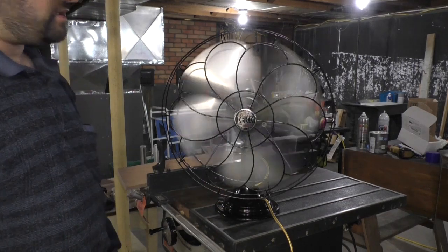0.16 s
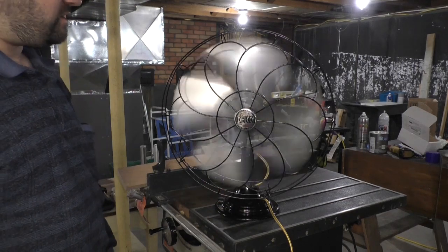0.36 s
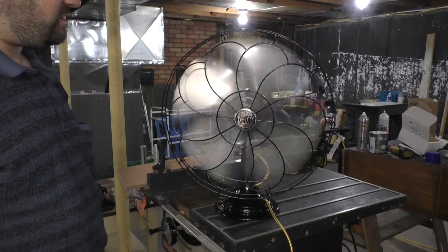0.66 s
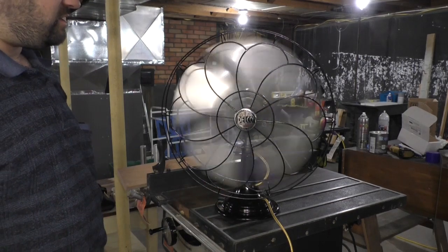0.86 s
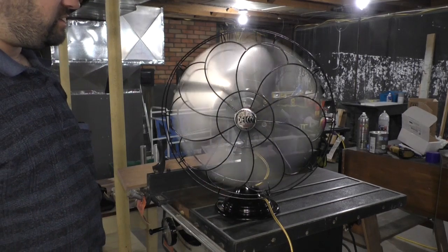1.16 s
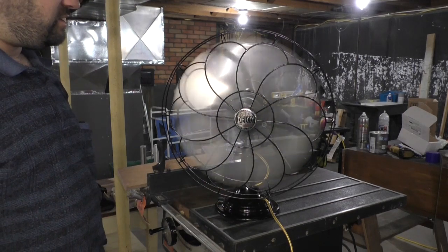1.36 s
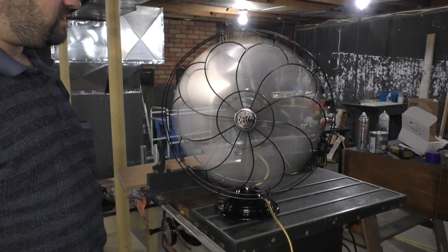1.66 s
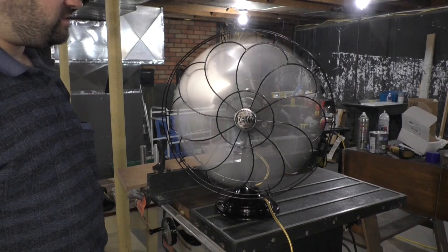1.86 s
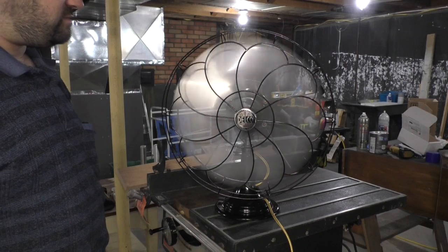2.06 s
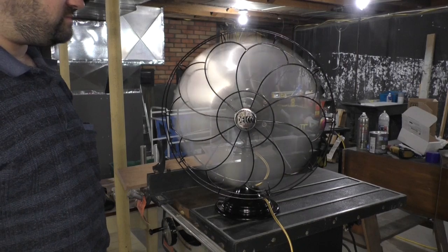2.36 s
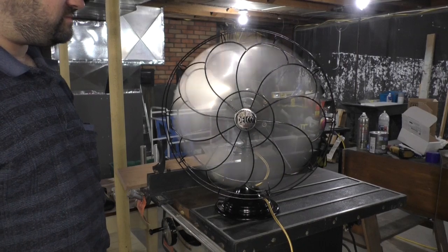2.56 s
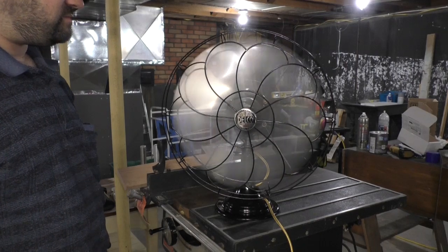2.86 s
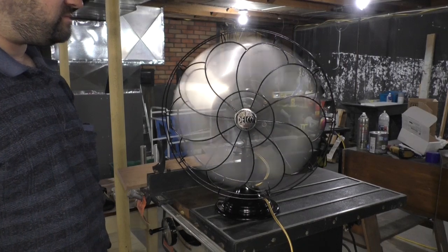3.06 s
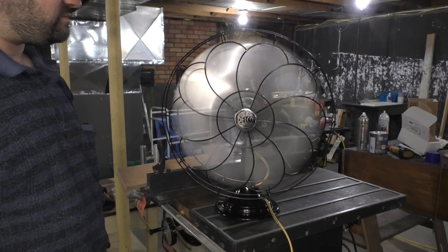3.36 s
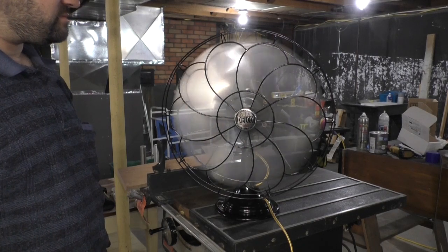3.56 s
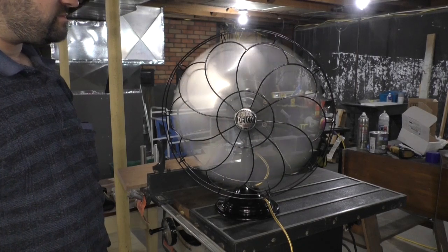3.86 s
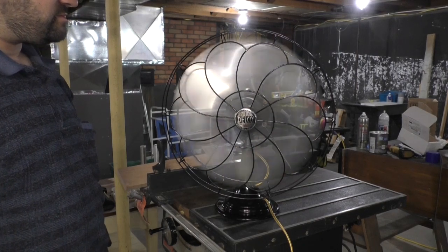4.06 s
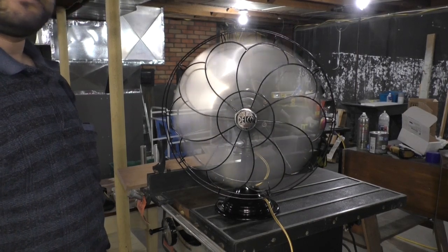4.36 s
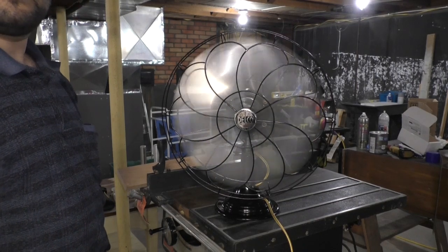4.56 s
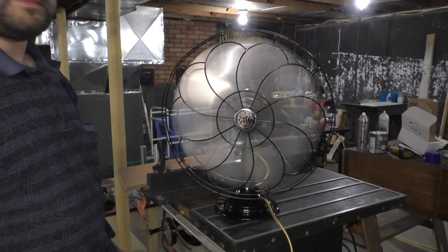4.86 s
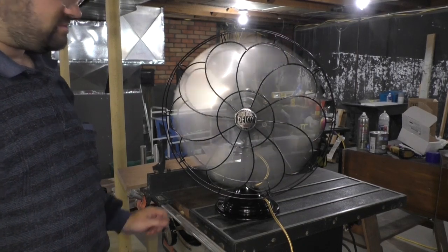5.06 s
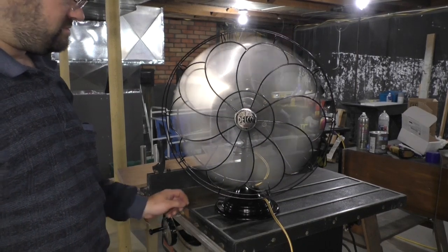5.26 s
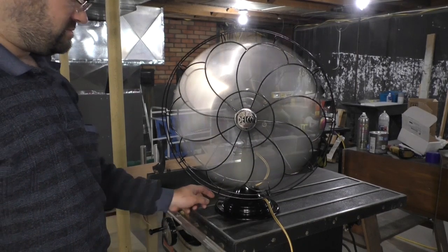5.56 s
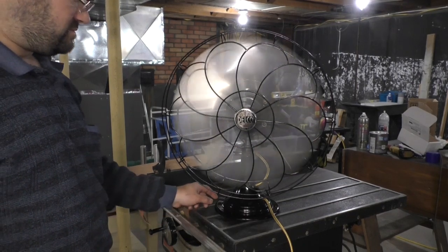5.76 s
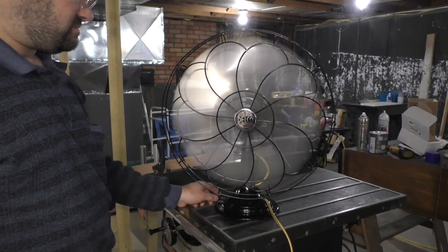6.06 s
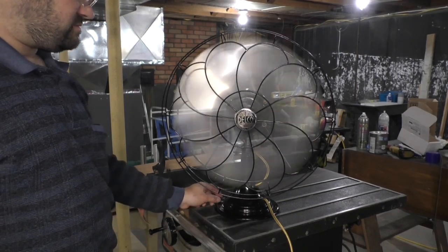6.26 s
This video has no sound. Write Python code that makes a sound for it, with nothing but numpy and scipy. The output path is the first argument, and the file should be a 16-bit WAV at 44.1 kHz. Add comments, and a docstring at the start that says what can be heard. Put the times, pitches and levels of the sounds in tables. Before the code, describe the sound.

A large vintage fan runs up in front of a close stereo microphone. First comes a pulsing electric hum over faint room tone, then a soft bump and deep wind rumble. Blade hiss brightens into a steady broad rush, with brief thin metallic chatter. Strong air buffets the microphone ever more densely with thuds, flaps and crackling pops, overloading slightly, and never stops.

```python
"""An old desk fan runs up in a workshop, facing a two-port microphone that its air stream reaches.
The motor hums in harmonics of the mains pull, a loose part rings at every knock, and the blades shed
hiss that reaches higher as the fan runs up. Gusts of shaped noise, thumping eddies, tearing flutters,
pops and spikes buffet the ports over a quiet room tone. The input cuts more bass along a set time
course, ducks its gain when the level is high and rounds off the peaks."""
import sys
import numpy as np
from scipy import signal
from scipy.io import wavfile
from scipy.ndimage import uniform_filter1d, minimum_filter1d

SR = 44100
rng = np.random.default_rng(int(sys.argv[2]) if len(sys.argv) > 2 else 0)


def materialize(psi):
    """Save the field psi as 16-bit PCM at rate SR to the path in sys.argv[1].

    A 1-D psi becomes a single channel; in a 2-D psi each row is a channel.
    """
    bounded = np.clip(np.atleast_2d(psi).T, -1, 1)
    quanta = np.round(bounded * 32767).astype(np.int16)
    wavfile.write(sys.argv[1], SR, quanta)


N = 282548
HOP, SIZE = 128, 512  # noise frames, in samples
FRAME_T = np.arange(N // HOP + 5) * HOP / SR
BIN_HZ = np.fft.rfftfreq(SIZE, 1 / SR)[:, None]
HALF_EACH = np.array([[.5], [-.5]])  # splits a left-right difference between the ports

# Rotor speed: (time [s], speed [turns/s])
ROTOR_SPEED = [(0, 8.3), (.6, 9.0), (1.0, 10.6), (1.5, 12), (1.9, 15), (2.4, 16.1), (3.3, 16.8),
               (5.0, 17.5), (6.41, 17.4)]
FIRST_TURN = .13  # part of a turn already done at the start

# Motor hum, before its swell: (multiple of the mains pull, level [dB rms without throb],
# throbs per rotor turn, throb depth [0-1], throb lag [turns], left-right difference [dB])
HUM_HARMONICS = [(1, -35.5, 1, .65, -.036, 1), (2, -32, 1, .12, .04, -.5), (3, -31, 2, .1, 0, -.5),
                 (4, -41, 2, .4, .13, 3)]
# Swell of the whole hum: (time [s], level [dB])
HUM_SWELL = [(0, -6.5), (.15, -5), (.45, -4), (.64, -5.5), (.72, -12), (1.5, -14), (6.41, -16)]
MAINS_PULL_HZ, HUM_WAVER_DB = 119.9, 1.2

# Rings of the loose part: (frequency [Hz], width [Hz], level [dB])
LOOSE_PART_RINGS = [(3940, 90, 0), (6340, 75, -8), (8270, 130, -21), (9680, 110, -20)]
# Spells of chatter: (start [s], length [s], level at the end before chance and turn [dB])
CHATTER_SPELLS = [(1.249, .1, -33), (1.385, .06, -32), (1.48, .05, -32), (1.61, .04, -33), (1.68, .1, -31),
                  (1.81, .11, -29), (1.94, .1, -28), (2.07, .2, -33), (2.34, .16, -34), (2.585, .035, -25),
                  (2.714, .095, -31), (2.843, .12, -33), (3.124, .17, -36)]
# Single bright knocks: (time [s], level before the treble filter [dB])
BRIGHT_TICKS = [(0.0574, -48), (1.233, -40), (1.3309, -43), (2.5975, -38), (2.9394, -40)]
CHATTER_SWELL_DB, FAINT_CHATTER_DB = 4, -40  # growth within a spell; level between spells

# Blade hiss: (time [s], level [dB], upper edge [Hz])
BLADE_HISS = [(0, -45, 2450), (.6, -39, 3670), (1.0, -34.5, 5340), (1.3, -32.5, 7000), (1.6, -30, 9100),
              (1.95, -28, 14100), (2.5, -28, 14500), (2.72, -28.5, 15000), (2.93, -28, 15000),
              (2.98, -31, 15000), (3.2, -29, 14900), (3.5, -31.5, 14800), (4.2, -30, 15200),
              (4.8, -30, 15300), (5.5, -31, 16000), (6.41, -30, 16000)]
# Colour of the blade hiss: (frequency [Hz], relative level [dB per Hz])
BLADE_COLOUR = [(60, -19), (200, 6), (600, -11.5), (900, -8.5), (1200, -3), (1700, -3.5), (2500, -6),
                (3500, -6.5), (4200, -10.5), (4900, -14.5), (6400, -19), (7500, -23.5), (9700, -25),
                (13500, -30), (14800, -34), (15600, -60)]
# Stereo image of the blade hiss: (frequency [Hz], left-right likeness [-1 to 1])
BLADE_LIKENESS = [(200, 0.63), (1300, 0.85), (2400, 0.83), (4400, 0.88), (5400, 0.94), (6000, 1.0),
                  (15000, 1.0)]

# Gusts at the microphone: (start [s], length [s], strength at mid-gust [dB], change to the end [dB])
GUSTS = [(0.677, 0.05, -20, 1), (0.769, 0.029, -22.5, 0), (0.795, 0.02, -23.5, -12),
         (0.832, 0.19, -17.5, 0.5), (1.032, 0.17, -18.5, 2), (1.209, 0.066, -16.5, -1),
         (1.279, 0.14, -19.5, 0), (1.4, 0.049, -22.5, -5), (1.44, 0.041, -19.5, 1), (1.571, 0.081, -20, 0),
         (1.677, 0.03, -24.5, 13), (1.698, 0.081, -20.5, 2), (2.048, 0.067, -17.5, -4),
         (2.233, 0.043, -12.5, 0), (2.283, 0.068, -15.5, -1), (2.382, 0.076, -19, 0),
         (2.423, 0.064, -19.5, 0), (2.473, 0.22, -16.5, -0.5), (2.678, .07, -25, -10),
         (2.757, .06, -21.5, 3), (2.82, 0.091, -32.5, 5), (2.949, 0.066, -15, 3), (3.02, 0.049, -22.5, 5),
         (3.059, 0.025, -17.5, -6), (3.087, 0.083, -18.5, -1), (3.176, 0.039, -20, 2),
         (3.207, 0.055, -20.5, 2), (3.292, 0.027, -12.5, -1), (3.331, 0.061, -21, 3),
         (3.385, 0.077, -19, -1), (3.447, .08, -23.5, -9), (3.52, 0.05, -23.5, -4),
         (3.571, 0.076, -14.5, -9), (3.641, 0.067, -19.5, -1), (3.767, 0.068, -18.5, 8),
         (3.897, 0.05, -20, 1), (3.95, 0.04, -16.5, 3), (3.999, 0.047, -26, 11), (4.045, 0.026, -20.5, -7),
         (4.066, 0.043, -18.5, -9), (4.234, 0.089, -18.5, 1), (4.279, 0.042, -20, -25),
         (4.314, 0.064, -17.5, -9), (4.377, 0.088, -15, 3.5), (4.578, 0.061, -15.5, 13),
         (4.658, 0.026, -12.5, -5), (4.707, .04, -23, 0), (4.744, 0.119, -15.5, 1.5),
         (4.862, 0.086, -17.5, -12), (4.912, 0.071, -18.5, 2), (5.025, 0.09, -15, -1),
         (5.101, 0.035, -31, -9), (5.142, 0.08, -14.5, -10), (5.19, 0.028, -11, -5), (5.272, 0.049, -21, 0),
         (5.321, 0.17, -13, -2.5), (5.496, 0.11, -15, 4), (5.615, 0.028, -20, 2), (5.654, 0.024, -18, 8),
         (5.698, 0.023, -18.5, 7), (5.746, 0.034, -20, 3), (5.791, 0.071, -18.5, -1),
         (5.835, 0.042, -29, 22), (5.862, 0.022, -16, 0), (5.889, 0.033, -21.5, -5),
         (5.974, 0.082, -19, -9), (6.061, 0.043, -16.5, 0), (6.085, 0.11, -21, -15),
         (6.184, 0.058, -16.5, 6), (6.265, 0.1, -20, 1), (6.338, 0.035, -20.5, -10)]
# Air stream between gusts: (time [s], level [dB])
LULL = [(.5, -77), (.64, -33), (1.0, -22), (1.5, -30.5), (2.0, -27.5), (2.9, -32), (3.2, -24.5),
        (4.5, -28.5), (5.2, -19), (6.41, -36)]
# Build-up of the stream: (time [s], factor on the eddy pitch)
STREAM_BUILDS = [(.62, 0.31), (.8, 0.36), (1.0, 0.62), (1.3, 0.86), (2.2, 0.96), (6.41, 1.09)]
# Colour of the wind before its pitch shift: (frequency [Hz], relative level [dB per Hz])
WIND_COLOUR = [(20, -34), (70, -23.5), (144, 1), (225, 0), (316, 0), (480, -2.5), (810, -12.5),
               (1140, -19.5), (1700, -34), (2500, -41), (5000, -87)]
# Stereo image of the wind: (frequency [Hz], left-right likeness [-1 to 1])
WIND_LIKENESS = [(60, 1), (200, 0.97), (380, 0.64), (700, -0.26), (1290, 0.45), (2400, -0.19)]
GUST_RISE_DB_S, GUST_FALL_DB_S = 2200, 998
GUST_BUILD_S = 0.0051  # full strength this long after the start
TAIL_BELOW_DB, TAIL_FALL_DB_S = 7, 150  # a gust leaves a weaker wake that sags slowly
PITCH_PER_DB, PITCH_AT_DB = -0.02, -16.5  # stronger air sheds larger, lower eddies
# Treble rises by extra dB for each dB of strength, and loses no more than the least
CRACKLE_HZ, CRACKLE_PER_DB, CRACKLE_LEAST_DB = 840, 2, -20

# Flutters on the ports: (start [s], length [s], level [dB], left-right likeness [-1 to 1],
# left-right difference [dB])
FLUTTERS = [(0.964, 0.037, -32.5, 0.32, -6), (1.05, 0.03, -40, 0.2, -5), (1.122, 0.053, -33.5, 0.4, -3),
            (1.22, 0.041, -30, -0.028, -2), (1.315, 0.038, -29, 0.13, -2), (1.388, 0.025, -29, -0.4, 1),
            (1.455, 0.021, -25.5, -0.28, -5.5), (1.587, 0.048, -24.5, -0.27, 0),
            (1.67, 0.039, -30, -0.63, -5), (1.743, 0.043, -27, -0.59, -1), (2, 0.019, -25.5, -0.5, -3),
            (2.065, 0.035, -24.5, 0.014, -2), (2.152, 0.026, -25, -0.63, -2),
            (2.245, 0.017, -19.5, 0.7, -4), (2.318, 0.02, -18.5, -0.27, -4),
            (2.378, 0.042, -21.5, -0.64, -0.5), (2.446, 0.085, -26.5, -0, -3), (2.5, 0.043, -27.5, 0.2, -2),
            (2.559, 0.037, -22.5, -0.54, 1), (2.628, 0.038, -20, 0.37, -1.0),
            (2.768, 0.026, -20.5, -0.72, 0.5), (2.881, 0.025, -30, -0.63, -1),
            (2.965, 0.033, -21.5, 0.53, 1), (3.014, 0.064, -20.5, -0.42, 0.5),
            (3.13, 0.035, -20.5, -0.33, -3), (3.204, 0.027, -20.5, -0.024, 0),
            (3.297, 0.057, -23, -0.024, -0.5), (3.397, 0.034, -20.5, 0.49, -4),
            (3.577, 0.036, -22, 0.39, 0), (3.638, 0.046, -25, -0.76, -3), (3.693, 0.024, -27.5, -0.54, 3),
            (3.788, 0.018, -19, -0.25, 2), (3.862, 0.055, -23, -0.32, -0.5), (3.958, 0.025, -22, 0.01, 0),
            (4.057, 0.092, -30.5, -0.5, -2), (4.259, 0.019, -17, -0.33, 0), (4.328, 0.03, -28, 0.55, -6),
            (4.403, 0.062, -19, 0.24, -0.5), (4.61, 0.056, -24.5, -0.13, -1),
            (4.657, 0.052, -26, -0.61, -2), (4.764, 0.048, -24, -0.3, -1), (4.827, 0.014, -27.5, 0.87, -6),
            (4.954, 0.032, -24.5, -0.15, 0), (5.035, 0.024, -22.5, 0.48, -1),
            (5.107, 0.018, -23.5, 0.2, -4.0), (5.192, 0.033, -24.5, 0.3, 1), (5.268, 0.021, -18, -0.2, 0),
            (5.349, 0.016, -18.5, 0.5, 1), (5.372, 0.056, -21, 0.15, -1), (5.475, 0.096, -22.5, 0.1, -1.0),
            (5.58, 0.022, -25, 0.1, -5), (5.66, 0.06, -32, 0.6, -3), (5.76, 0.077, -26.5, -0.074, -1),
            (5.896, 0.018, -25, -0.65, -2.0), (5.983, 0.044, -30, 0.61, -3),
            (6.072, 0.082, -27.5, -0.36, 1), (6.2, 0.028, -29, -0.0036, -4), (6.293, 0.017, -29, 0.28, -11),
            (6.333, 0.036, -25.5, -0.61, 0)]
# Colour of the flutters: (frequency [Hz], relative level [dB per Hz])
FLUTTER_COLOUR = [(300, -2), (600, 0), (900, 0.5), (1400, -2.5), (2000, -13.5), (3000, -23), (5000, -50),
                  (7000, -80)]
FLUTTER_RISE_DB_S, FLUTTER_FALL_DB_S = 614, 607

# Single big eddies: (time [s], nominal peak before side and skin [dB], settled pitch [Hz])
SLAPS = [(.39, -30, 56), (.559, -44, 88.8), (0.676, -14, 99), (.69, -30, 48), (.75, -32, 45),
         (0.846, -23, 47.6), (.96, -21, 55), (1.06, -35, 54.6), (.703, -22, 109), (.725, -23, 101),
         (0.831, -19.5, 217), (0.869, -15, 151), (0.905, -25, 140), (0.947, -11, 151), (0.978, -5.5, 235),
         (1.047, -25, 185), (1.171, -9.5, 229), (1.242, -15.5, 387), (1.456, -16, 230), (1.605, -8.5, 218),
         (1.681, -15, 393), (1.707, -14, 370), (1.885, -18, 367), (2.055, -12, 350), (2.237, -10, 296),
         (2.428, -24, 237), (2.529, -4, 320), (2.625, -9, 276), (2.65, -8, 230), (2.757, -21, 207),
         (2.951, -5.5, 331), (2.973, -18, 347), (2.995, -4.5, 313), (3.062, -11, 420), (3.12, -14, 307),
         (3.208, -7.5, 217), (3.297, -13, 418), (3.335, -11, 203), (3.398, -4, 355), (3.421, -8.5, 293),
         (3.547, -17.5, 180), (3.579, -5.5, 304), (3.769, -11.5, 303), (3.898, -11, 430), (3.957, -12, 248),
         (4.047, -12, 360), (4.259, -17, 427), (4.338, -6, 272), (4.401, -13, 233), (4.453, -8.5, 300),
         (4.618, -3, 201), (4.662, -6.5, 392), (4.758, -16, 245), (4.832, -7.5, 392), (4.942, -13, 290),
         (5.036, -4.5, 410), (5.143, -8.5, 225), (5.194, -11, 262), (5.351, -7, 197), (5.392, -2, 410),
         (5.515, -10, 233), (5.668, -9.5, 404), (5.703, -9, 268), (5.75, -16, 272), (5.813, -11, 248),
         (5.974, -10.5, 297), (6.076, -11.5, 392), (6.207, -9.5, 394), (6.287, -9.5, 302)]
SLAP_SIDE_DB = -1  # scale of the random left-right difference

# Eddies bursting on a port: (time [s], level before envelope and grit [dB], frequency [Hz],
# left-right difference [dB])
POPS = [(0.977, -13, 527, 1), (1.325, -18, 501, 1), (1.457, -26, 549, -1.5), (1.609, -16, 507, 0.5),
        (2.233, -6, 534, 1), (2.429, -15.5, 530, -4), (2.956, -8.5, 504, -6), (3.398, -9.5, 507, 1),
        (3.58, -19, 503, -4), (3.819, -23, 516, 2), (4.338, -8, 550, 2), (4.454, -7, 510, -0.5),
        (4.616, -9, 547, 1), (4.666, -14, 504, 3), (4.835, -9, 513, -3), (5.037, -14, 510, 4),
        (5.15, -12, 552, 3), (5.196, -20, 600, -0.5), (5.75, -16, 564, -1.5), (5.876, -16, 527, -4),
        (5.974, -13, 500, 3), (6.0, -9.5, 725, -1)]
POP_CYCLES, POP_GRIT = 2.2, .55  # decay length; share of rough noise

# Spikes from small eddies cut off by the port edge
SPIKE_LOW_HZ, SPIKE_HIGH_HZ, SPIKE_CYCLES = 450, 1300, 1.1
SPIKES_PER_S, SPIKE_DB, SPIKE_SPREAD_DB = 110, -5, 3.5  # mean rate; offset from the stream; spread
SPIKE_BUILD_DB = 60  # dB per decade of the build-up factor

# Colour of the room tone: (frequency [Hz], relative level [dB per Hz])
ROOM_COLOUR = [(30, -13), (90, -3), (300, -9), (600, -22.5), (1700, -16.5), (4000, -37), (7000, -38),
               (10500, -33.5), (14000, -32.5), (15600, -34)]
# Stereo image of the room tone: (frequency [Hz], left-right likeness [-1 to 1])
ROOM_LIKENESS = [(60, 0.74), (400, 1), (2400, 1), (4400, 0.15), (5600, 0.26), (6200, 1), (9000, 0.98),
                 (10500, 0.68), (15000, 0.57)]
# Level of the room tone over time, relative to ROOM_DB: (time [s], level [dB])
ROOM_LEVEL = [(0, 0), (1.1, 2.5), (1.5, -1), (2.0, -10), (6.41, -22)]
ROOM_DB = -43

# Wind filter at the microphone input: (time [s], corner [Hz])
BASS_CUT = [(0, 25.7), (.95, 30.2), (1.2, 55), (1.35, 75), (1.5, 133), (6.41, 134)]
DUCK_FROM_DB, DUCK_SHARE, RECOVER_DB_S = -15, 0.41, 158  # threshold; share taken off; recovery
LINGER_SHARE, LINGER_S = 0.24, 0.95  # a slower part of the ducking
HOLD_S = 0.035  # wait before the ducking recovers
CEILING, EDGE_HZ = 1.0, 15750  # soft limit of the input; upper band limit


def gain_of(db):
    """Decibels to gain."""
    return 10 ** (np.asarray(db) / 20)


def evened(x):
    """Scaled to rms 1."""
    return x / np.sqrt(np.mean(x ** 2) + 1e-20)


def read(points, hz):
    """Value of a spectrum table on a log-frequency axis."""
    f, value = np.transpose(points)
    return np.interp(np.log(hz + 1), np.log(f + 1), value)


def columns(rows, t):
    """Every column of a curve table at the times t."""
    s, *rest = np.transpose(rows)
    return [np.interp(t, s, c) for c in rest]


def add(mix, s, sound):
    """Mixes a sound in at second s."""
    part = mix[..., round(s * SR):][..., :sound.shape[-1]]
    part += sound[..., :part.shape[-1]]


def wander(seconds, shape):
    """Smooth chance of rms 1 along the last axis, at frame rate."""
    width = max(seconds * SR / HOP, .3)
    bell = np.exp(-.5 * (np.arange(-60, 61) / width) ** 2)
    bell = bell.reshape((1,) * (len(shape) - 1) + (-1,))
    return evened(signal.fftconvolve(rng.standard_normal(shape), bell, "same", axes=-1))


def patches(seconds, bins):
    """Random lumps of rms 1, smooth over time and over neighbouring frequency bins."""
    return evened(uniform_filter1d(wander(seconds, (len(BIN_HZ), len(FRAME_T))), size=bins, axis=0))


def noise(shape_db, level_db, likeness, field_db):
    """Two-port noise: each frame has the spectrum shape_db and rms level_db; field_db roughens it."""
    a, b, c, d = rng.standard_normal((len(FRAME_T), len(BIN_HZ), 4)).T
    like = np.clip(read(likeness, BIN_HZ), -1, 1)
    left = a + 1j * b
    right = like * left + np.sqrt(1 - like ** 2) * (c + 1j * d)
    shape = gain_of(shape_db)
    shape = shape / np.sqrt((shape ** 2).sum(axis=0))
    unit = np.sqrt(3 / 2)  # overlapped windows then add up to rms 1
    frames = unit * np.array([left, right]) * shape * gain_of(level_db + field_db)
    return signal.istft(frames, nperseg=SIZE, noverlap=SIZE - HOP)[1][:, :N]


def turns(t):
    """Rotor angle in turns, summed from its speed."""
    return FIRST_TURN + np.cumsum(columns(ROTOR_SPEED, t)[0]) * (t[1] - t[0])


def hum():
    """Harmonics of the mains pull, throbbing as the uneven rotor passes the poles and wavering a little."""
    t, out = np.arange(N) / SR, np.zeros((2, N))
    angle = turns(t)
    for multiple, db, per_turn, depth, lag, pan_db in HUM_HARMONICS:
        throb = 1 + depth * np.cos(2 * np.pi * round(per_turn) * (angle - lag))
        waver_db = HUM_WAVER_DB * np.interp(t, FRAME_T, wander(0.038, FRAME_T.shape))
        # all harmonics start in step: one buzz per pull
        tone = np.sqrt(2) * np.sin(2 * np.pi * round(multiple) * MAINS_PULL_HZ * t)
        out += gain_of(db + waver_db + HALF_EACH * pan_db) * throb * tone
    return out * gain_of(columns(HUM_SWELL, t)[0])


def ring():
    """One knock on the loose part: damped resonances, softened because the contact lasts a moment."""
    t = np.arange(1000) / SR
    soft = 1 - np.exp(-(t / .0003) ** 2)
    out = np.zeros(len(t))
    for hz, width, db in LOOSE_PART_RINGS:
        out += gain_of(db) * np.exp(-np.pi * width * t) * np.sin(2 * np.pi * hz * t)
    return soft * out


def ticks():
    """Single bright knocks: short decaying noise, kept to the treble."""
    out = np.zeros(N)
    bright = signal.butter(2, [5500, 11000], "band", fs=SR, output="sos")
    for s, db in BRIGHT_TICKS:
        snap = rng.standard_normal(300) * np.exp(-np.arange(300) / 340.0)
        add(out, s, gain_of(db) * signal.sosfilt(bright, snap))
    return out


def chatter(spread_db=3.5, jitter_s=0.0025, once_a_turn_db=3):
    """From the first spell on, each mains pull knocks the loose part, harder at one point of the turn."""
    t = np.arange(CHATTER_SPELLS[0][0], N / SR - .05, 1 / MAINS_PULL_HZ)
    size, late = rng.standard_normal((len(t), 2)).T
    level_db = np.full(len(t), float(FAINT_CHATTER_DB))
    for start, length, db in CHATTER_SPELLS:
        done = (t - start) / length
        inside = (done >= 0) & (done <= 1)
        level_db = np.where(inside, db - CHATTER_SWELL_DB * (1 - done), level_db)
    angle = np.interp(t, FRAME_T, turns(FRAME_T))
    level_db += spread_db * np.minimum(size, 1.3)
    level_db += once_a_turn_db * np.cos(2 * np.pi * (angle - .08))
    knocks = np.zeros(N)
    knocks[((t + jitter_s * late) * SR).astype(int)] = gain_of(level_db)
    return signal.oaconvolve(knocks, ring())[:N]


def rush(patchy_db=0.68, flicker_db=0.8, once_a_turn_db=.9):
    """Hiss shed by the blade edges, reaching higher in the run-up; one bent blade pulses it once a turn."""
    db, edge_hz = columns(BLADE_HISS, FRAME_T)
    pulse_db = once_a_turn_db * np.cos(2 * np.pi * (turns(FRAME_T) - .08))
    field_db = pulse_db + patchy_db * patches(0.0047, 9) + flicker_db * wander(0.0019, FRAME_T.shape)
    shelf_db = -13 / (1 + (edge_hz / (BIN_HZ + 1)) ** 5)  # treble above the edge is weaker
    return noise(read(BLADE_COLOUR, BIN_HZ) + shelf_db, db, BLADE_LIKENESS, field_db)


def stream_db(t):
    """Strength of the air stream: each gust rises, holds with a drift, and falls back to the lull."""
    db = columns(LULL, t)[0]
    for start, length, strength_db, change_db in GUSTS:
        held = strength_db + change_db * (np.clip((t - start) / length, 0, 1) - .5)
        rise = GUST_RISE_DB_S * np.maximum(start + GUST_BUILD_S - t, 0)
        fall = GUST_FALL_DB_S * np.maximum(t - start - length + GUST_BUILD_S, 0)
        wake = held - TAIL_BELOW_DB - TAIL_FALL_DB_S * (t - start - length)
        wake = np.minimum(wake, held - TAIL_BELOW_DB)
        wake = np.where(t > start + length / 2, wake, -99)
        db = np.maximum(db, np.maximum(held - rise - fall, wake))
    return db


def wind(own_db=1.0, patchy_db=1.0, lumpy_db=2.5, ragged_db=2.5, ragged_s=0.0014):
    """Eddies tumble over the ports: shared lumps, some of each port's own, and a ragged fine grain."""
    db = stream_db(FRAME_T)
    field_db = lumpy_db * wander(0.01, FRAME_T.shape) + patchy_db * patches(0.025, 4)
    field_db = field_db + own_db * wander(0.0024, (2, 1, len(FRAME_T)))
    pitch = np.clip(1 + PITCH_PER_DB * (db - PITCH_AT_DB), .3, 2) * columns(STREAM_BUILDS, FRAME_T)[0]
    crackle_db = np.maximum(CRACKLE_PER_DB * (db - PITCH_AT_DB), CRACKLE_LEAST_DB)
    crackle_db = crackle_db / (1 + (CRACKLE_HZ / (BIN_HZ + 1)) ** 2)
    air = noise(read(WIND_COLOUR, BIN_HZ / pitch) + crackle_db, db, WIND_LIKENESS, field_db)
    smooth = signal.butter(3, 1 / (2 * np.pi * ragged_s), fs=SR, output="sos")
    shared_and_own = rng.standard_normal(N) + .5 * rng.standard_normal((2, N))
    grain = evened(signal.sosfilt(smooth, shared_and_own))
    return air * gain_of(ragged_db * grain)


def slaps(rise_s=0.0024, cycles=2.87, glide=0.24, rough=0.11, skin_hz=640.0):
    """A big eddy thumps both ports: a few sagging cycles with a ragged skin that differs at each port."""
    out, t = np.zeros((2, N)), np.arange(6000) / SR
    band = signal.butter(2, [0.84 * skin_hz, 1.37 * skin_hz], "band", fs=SR, output="sos")
    for s, db, hz in SLAPS:
        start, skew = rng.random(), rng.normal(0, .055)  # phase and port offset, in cycles
        side_db = SLAP_SIDE_DB * rng.standard_normal() * HALF_EACH
        decay = np.exp(-t * hz / cycles)
        shape = (1 - np.exp(-(t / max(rise_s, 0.27 / hz)) ** 2)) * decay
        angle = start + hz * t * (1 + glide * decay) + np.array([[skew], [-skew]])
        skin = evened(signal.sosfilt(band, rng.standard_normal((2, len(t)))))
        thump = np.sin(2 * np.pi * angle) + rough * min(hz / 200, 1) ** 2 * skin
        add(out, s, gain_of(db + side_db) * shape / shape.max() * thump)
    return out


def flutters(lumpy_db=2.5):
    """Small eddies break on the ports in short bright tears, pushing them alike or against each other."""
    unrelated = [(0, 0), (SR, 0)]
    lumps_db = lumpy_db * wander(0.0019, FRAME_T.shape)
    a, b = noise(read(FLUTTER_COLOUR, BIN_HZ), 0, unrelated, lumps_db)
    out, t = np.zeros((2, N)), np.arange(-.03, .25, 1 / SR)
    for start, length, db, like, pan_db in FLUTTERS:
        at = round(start * SR) + np.arange(len(t)) + round(t[0] * SR)
        keep, like = at < N, np.clip(like, -1, 1)
        at = at[keep]
        rise = FLUTTER_RISE_DB_S * np.maximum(-t, 0)
        fall = FLUTTER_FALL_DB_S * np.maximum(t - length, 0)
        shape = gain_of(db - rise - fall)[keep]
        pair = np.array([a[at], like * a[at] + np.sqrt(1 - like ** 2) * b[at]])
        out[:, at] += shape * pair * gain_of(HALF_EACH * pan_db)
    return out


def pops():
    """An eddy bursts on a port: a sudden pressure snap, a few fading cycles with a gritty edge."""
    out, t = np.zeros((2, N)), np.arange(900) / SR
    band = signal.butter(2, [700, 1600], "band", fs=SR, output="sos")
    for s, db, hz, pan_db in POPS:
        grit = evened(signal.sosfilt(band, rng.standard_normal((2, len(t)))))
        shape = (1 - np.exp(-t / .0005)) * np.exp(-t * hz / POP_CYCLES)
        snap = np.sin(2 * np.pi * hz * t) + POP_GRIT * grit
        add(out, s, gain_of(db + HALF_EACH * pan_db) * shape * snap)
    return out


def spikes(count=8):
    """Brief pressure spikes that follow the stream's strength, with random balance and sign at the ports."""
    chance, size, kind, side = rng.random((N, 4)).T
    t = np.arange(N) / SR
    db = np.interp(t, FRAME_T, stream_db(FRAME_T)) + SPIKE_DB
    db += SPIKE_BUILD_DB * np.log10(columns(STREAM_BUILDS, t)[0])
    db -= SPIKE_SPREAD_DB * np.log(np.maximum(size, .03))  # a few spikes stand out
    ports = np.array([np.cos(side * np.pi), np.sin(side * np.pi)])
    train = (chance < SPIKES_PER_S / SR) * gain_of(db) * ports
    out, u = np.zeros((2, N)), np.arange(-300, 301) / SR
    for k, hz in enumerate(np.geomspace(SPIKE_LOW_HZ, SPIKE_HIGH_HZ, count)):
        bell = np.exp(-(u * hz / SPIKE_CYCLES) ** 2 * 2)
        spike = np.sqrt(SPIKE_LOW_HZ / hz) * bell * np.cos(2 * np.pi * hz * u + k)
        chosen = (kind * count).astype(int) == k
        out += signal.oaconvolve(train * chosen, spike[None], "same")
    return out


def room_tone():
    """Quiet workshop air and the hiss of the microphone, as coloured noise on a set level course."""
    level_db = ROOM_DB + columns(ROOM_LEVEL, FRAME_T)[0]
    return noise(read(ROOM_COLOUR, BIN_HZ), level_db, ROOM_LIKENESS, 0.13 * wander(0.016, FRAME_T.shape))


def scene():
    """Fan, then its air on the microphone, then the room."""
    fan = hum() + chatter() + ticks() + rush()
    air = wind() + slaps() + flutters() + pops() + spikes()
    return fan + air + room_tone()


def cut_bass(dry):
    """Wind filter: a high-pass whose corner follows its time course."""
    hz, t, z = signal.stft(dry, SR, nperseg=2048)
    ratio = (hz[:, None] + 1e-3) / columns(BASS_CUT, t)[0]
    return signal.istft(z / np.sqrt(1 + ratio ** -7.0), SR, nperseg=2048)[1][:, :N]


def ducking_db(sound):
    """Gain control: the louder port's excess over the threshold is held, then let go quickly and slowly."""
    power_db = 10 * np.log10(abs(uniform_filter1d((sound ** 2).max(0), size=500)) + 1e-12)
    hold = 2 * round(HOLD_S * SR / 2) + 1
    power_db = -minimum_filter1d(-power_db, size=hold, origin=hold // 2)  # highest of the recent past
    fall = np.arange(N) * RECOVER_DB_S / SR
    over_db = np.maximum(np.maximum.accumulate(power_db + fall) - fall - DUCK_FROM_DB, 0)
    quick_db = DUCK_SHARE * uniform_filter1d(over_db, size=400, origin=180)
    step = 1 / (LINGER_S * SR)
    slow_db = LINGER_SHARE * signal.lfilter([step], [1, step - 1], over_db)
    return quick_db + slow_db


def record(dry):
    """Microphone input: wind filter, ducking gain, soft ceiling, band limit."""
    cut = cut_bass(dry)
    ducked = cut / gain_of(ducking_db(cut))
    rounded = CEILING * np.tanh(ducked / CEILING)
    band_limit = signal.firwin(1023, EDGE_HZ, window=("kaiser", 9), fs=SR)
    return signal.oaconvolve(rounded, band_limit[None], "same")


dry = scene()
out = record(dry)
materialize(out)
```